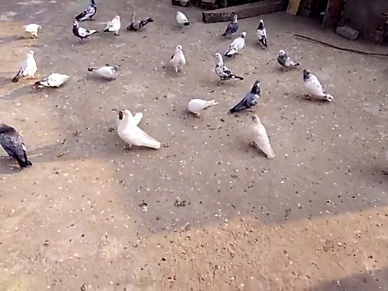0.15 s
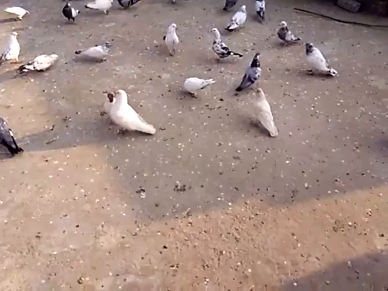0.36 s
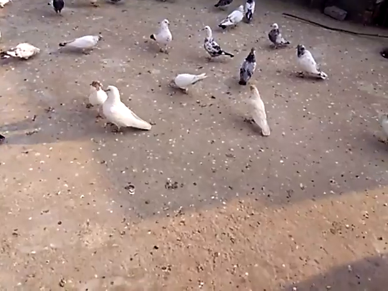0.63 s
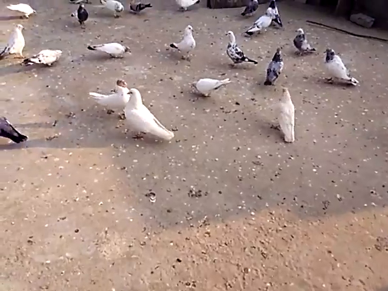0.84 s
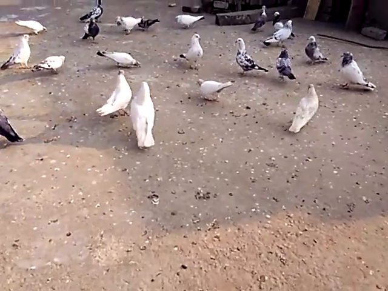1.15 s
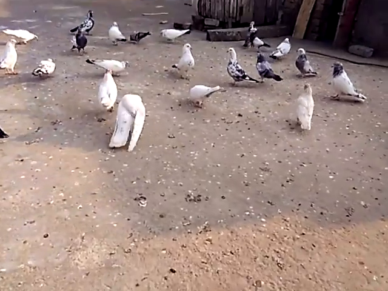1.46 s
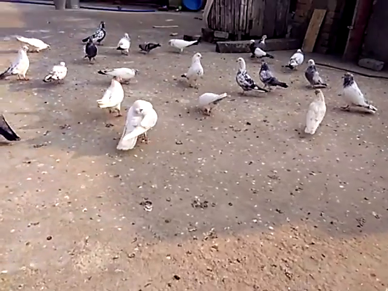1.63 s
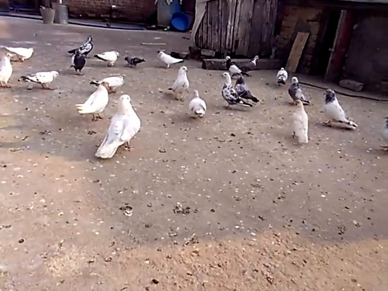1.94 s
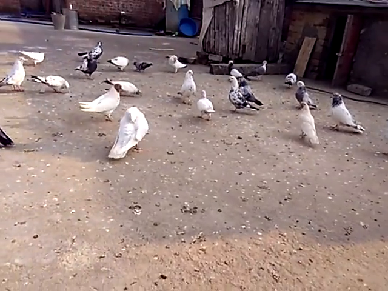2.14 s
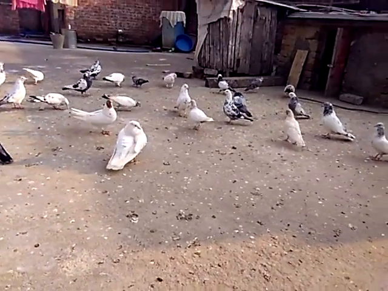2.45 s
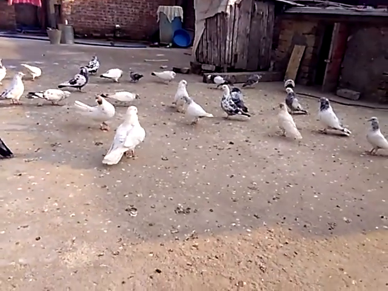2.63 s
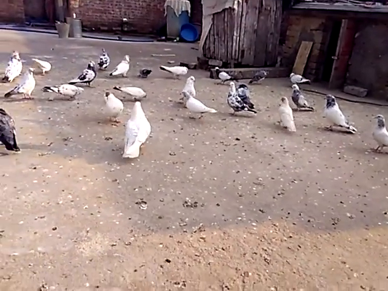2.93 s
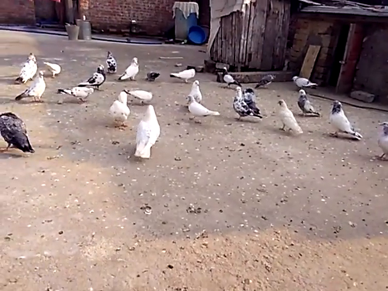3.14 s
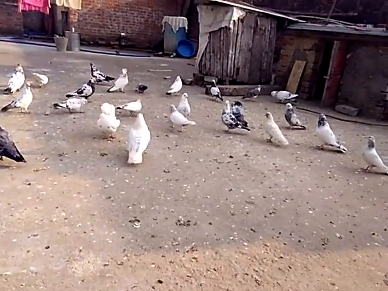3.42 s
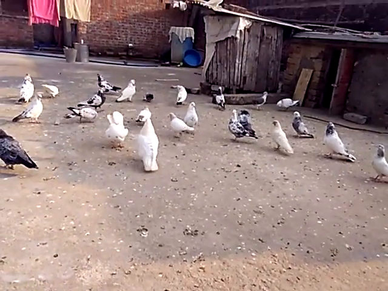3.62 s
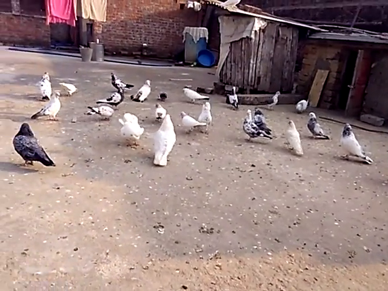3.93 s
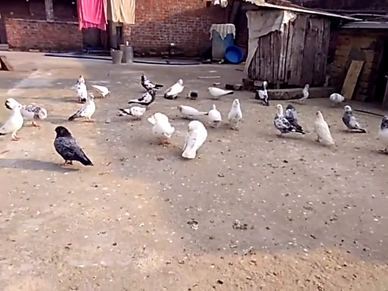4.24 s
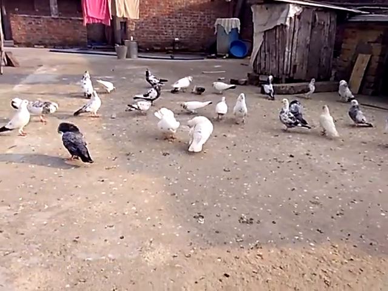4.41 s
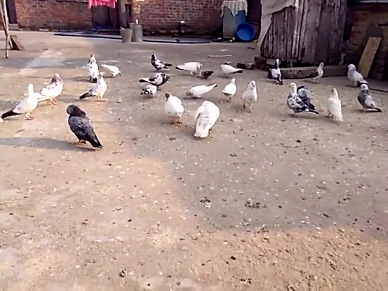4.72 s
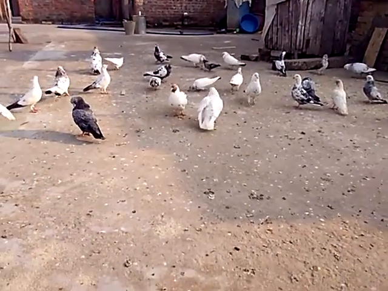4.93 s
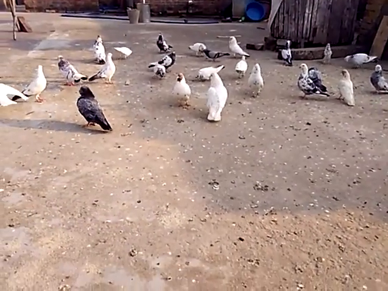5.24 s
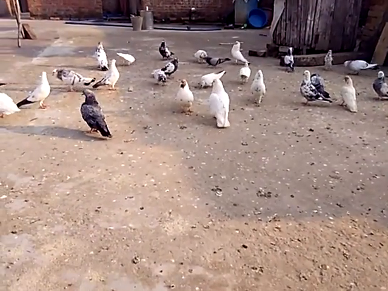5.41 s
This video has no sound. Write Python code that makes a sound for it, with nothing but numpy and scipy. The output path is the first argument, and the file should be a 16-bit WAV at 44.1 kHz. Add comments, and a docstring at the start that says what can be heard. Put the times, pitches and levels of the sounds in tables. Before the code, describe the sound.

Outdoor handheld pickup with slightly dulled highs and short, soft echoes from yard walls. Pigeons coo throughout, some close and throaty, many blended behind, with light pecking and pattering on dirt. Hoarse caws come from far away and fine hiss swells faintly. Midway, gritty shoe scuffs and a sharp dominant thud intrude close up; afterward there are more coos, sparse pecks and tiny stony clinks.

```python
"""Pigeons feed and coo in a brick courtyard over low outdoor rumble. From the start tiny clicks of feet and short
crunches of beaks and claws tick on the dirt, a flock of swelling notes murmurs, and crows caw far off with rasping
harmonics. Near males stutter short notes and slide down long hollow coos; from 1.2 s a faint high hiss swells
at times. From 3 to 4 s shoes scuff as filtered grit noise and thud as pushed dead modes close to the
microphone; cooing and pecking go on, and from 4.9 s flicked grit clinks on stone as decaying sines."""
import sys
import numpy as np
from scipy import signal
from scipy.fft import rfft, irfft
from scipy.io import wavfile
from scipy.ndimage import map_coordinates

SR = 44100
rng = np.random.default_rng(int(sys.argv[2]) if len(sys.argv) > 2 else 0)


def output_pcm(signal):
    """Save a mono or channel-first signal as 16-bit PCM at the path in sys.argv[1].

    Samples are clipped to [-1, 1] before scaling.
    """
    pcm = np.clip(np.atleast_2d(signal).T, -1, 1) * 32767
    wavfile.write(sys.argv[1], SR, np.round(pcm).astype(np.int16))


N = 245637
T = np.arange(N) / SR


def undb(db):
    """Decibels to gain."""
    return 10 ** (np.asarray(db) / 20)


def unit(x):
    """Scale to rms 1."""
    return x / np.sqrt(np.mean(x ** 2) + 1e-18)


def add(out, start_s, x):
    """Mix x into out from start_s, cut to the bounds of out."""
    i = int(start_s * SR)
    x, i = x[max(-i, 0):], max(i, 0)
    out[i:i + len(x)] += x[:max(N - i, 0)]


def wander(count, rate_hz):
    """Smooth chance of spread 1 that changes about rate_hz times a second."""
    place = np.arange(count) * rate_hz / SR
    return map_coordinates(rng.standard_normal(2048), [place], order=3, mode="wrap")


def colour(x, points):
    """Filter by a spectrum of (Hz, dB) points, straight on a log frequency axis; rms 1."""
    point_hz, point_db = np.transpose(points)
    bin_hz = np.maximum(np.fft.rfftfreq(len(x), 1 / SR), 1)
    gain = undb(np.interp(np.log(bin_hz), np.log(point_hz), point_db))
    return unit(irfft(rfft(x) * gain, len(x)))


def resonate(x, centre_hz, width_hz):
    """One resonance with gain 1 at its centre."""
    return signal.lfilter(*signal.iirpeak(centre_hz, centre_hz / width_hz, fs=SR), x)


def fade(t, edge_s):
    """Linear rise and fall at both ends of the times t."""
    return np.clip(np.minimum(t - t[0], t[-1] - t) / edge_s, 0, 1)


def swell(t, attack_s, hold_s, release_s):
    """Linear rise, hold, exponential decay; t counts from the start."""
    decay = np.exp(-np.maximum(t - attack_s - hold_s, 0) / release_s)
    return np.clip(t / attack_s, 0, 1) * decay


def grains(per_s, spread_db):
    """Random clicks, most small and a few large."""
    size = undb(spread_db * np.minimum(rng.exponential(size=N), 5))
    return (rng.random(N) < per_s / SR) * size * rng.standard_normal(N)


def yard(x, wet_db):
    """Scattered echoes from walls and sheds, dull and soon gone."""
    t60_s, first_echo_s = 0.42, .014
    t = T[:SR]
    hits = rng.standard_normal(SR) * (rng.random(SR) < .02)
    echoes = hits * undb(-60 * t / t60_s) * (t > first_echo_s)
    echoes = signal.lfilter(*signal.butter(1, 3000, fs=SR), echoes)
    wet = signal.fftconvolve(x, echoes / np.linalg.norm(echoes))[:N]
    return x + undb(wet_db) * wet


def throat(hz, second_db, rough):
    """Closed-beak voice, throbbing in pitch and strength; its second harmonic swells at the crop resonance."""
    crop_hz, crop_width_hz = 530, 83
    throb_hz, throb_depth, throb_pitch = 38, .12, .007  # depth and pitch as shares
    count = len(hz)
    throb_phase = 2 * np.pi * throb_hz * np.arange(count) / SR
    throb = np.sin(throb_phase + 2 * wander(count, throb_hz / 2))
    jitter = 0.0082 * wander(count, 37.3) + 0.1 * rough * wander(count, 130.55)
    phase = 2 * np.pi * np.cumsum(hz * (1 + throb_pitch * throb + jitter)) / SR
    tremble = 1 + throb_depth * throb + rough * (wander(count, 58.3) + .5 * wander(count, 339.3))
    second = undb(second_db) / np.hypot(1, 2 * (2 * hz - crop_hz) / crop_width_hz)
    return np.sqrt(2) * tremble * (np.sin(phase) + second * np.sin(2 * phase))


def note(hz, length_s, fall, rough):
    """Gaussian swell of the voice, length_s wide at 1/e of the peak; pitch runs from 1 + fall to 1 - fall."""
    u = np.linspace(-1, 1, int(2 * length_s * SR))
    return throat(hz * (1 - fall * u), -14.0, rough) * np.exp(-4 * u ** 2) / np.sqrt(2)


def ping(hz, t60_s, attack_s):
    """One small hard thing rings and dies away."""
    t = T[:SR // 12]
    return np.sin(2 * np.pi * hz * t) * np.minimum(t / attack_s, 1) * undb(-60 * t / t60_s)


def air():
    """Low outdoor rumble: coloured noise at a nearly steady level."""
    # spectrum: hz, relative_db
    air_colour = [(25, 8.5), (45, 1.5), (72, 9), (100, -5.5), (190, -3.5), (330, 0.5), (700, -10),
                  (1100, -19.5), (2000, -23.5), (4000, -31.5), (7000, -43.5), (9700, -42.5)]
    level_db = -54.5 + 0.083 * wander(N, 6.7)
    return colour(rng.standard_normal(N), air_colour) * undb(level_db)


def patter():
    """Small feet stir the dirt in uneven flurries of tiny clicks."""
    # stir of many feet: time_s, relative_level_db
    stir = [(0, -50.5), (.15, -61.5), (.3, -65), (.85, -62), (1.15, -69.5), (1.5, -62.5), (1.95, -66.5),
            (2.25, -67), (2.37, -72), (2.5, -72.5), (2.75, -67), (3.1, -62.5), (3.8, -66), (4.05, -65.5),
            (4.25, -75), (4.68, -75), (4.8, -60.5), (5.05, -64.5), (5.3, -68.5), (5.57, -71.5)]
    # dirt click spectrum: hz, relative_db
    dirt_colour = [(500, 3.5), (1200, 2), (3200, -1), (5000, -9.5), (7000, -11.5), (9700, -17.5)]
    swing_db = 3 * wander(N, 22.24)
    stir_db = np.interp(T, *np.transpose(stir)) + swing_db
    clicks = grains(1700, 2.3)
    return yard(colour(clicks, dirt_colour) * undb(stir_db - 5.0), wet_db=-7.0)


def flock(count=130):
    """Further birds overlap their low coos and higher grunts."""
    # murmur level: time_s, relative_level_db
    murmur = [(0.0, -59.5), (0.38, -67), (0.59, -54), (.98, -54), (1.3, -55), (1.55, -60), (1.88, -51.5),
              (2.2, -62.5), (2.4, -57.5), (2.53, -58), (2.75, -51), (2.95, -56.5), (3.1, -49.5),
              (3.25, -46.5), (3.57, -61), (4.1, -49.5), (4.3, -54.5), (4.5, -46.5), (4.67, -52),
              (4.98, -61), (5.23, -63.5), (5.57, -51.5)]
    out = np.zeros(N)
    for k, (when, pitch, length, size) in enumerate(rng.random((count, 4))):
        is_grunt = k % 2
        hz = (470 if is_grunt else 295) * (1 + .24 * (pitch - .5))
        db = 7 * size - (2.5 if is_grunt else 0)
        call = note(hz, 0.04 + 0.099 * length, fall=0.0948, rough=0.27)
        add(out, (k + when) / count * T[-1] - .1, undb(db) * call)
    level_db = np.interp(T, *np.transpose(murmur)) + 1.5
    return unit(yard(out, wet_db=-18.0)) * undb(level_db)


def crow():
    """Second and third harmonics of an arching pitch rasp by uneven flutter; a far wall repeats each caw."""
    # distant caws: start_s, length_s, top_fundamental_hz, droop_share, relative_level_db, third_re_second_db
    caws = [(-.1, .29, 665, .2, -56.5, -1), (.875, .26, 570, .27, -56, 2), (1.27, .29, 655, .22, -55, 0),
            (1.725, .28, 668, .26, -54, -2), (2.535, .27, 597, .1, -57.5, -5),
            (2.62, .24, 700, .15, -61, -12), (2.83, .22, 728, .12, -64, -11),
            (2.98, .25, 628, .15, -54, -5), (3.47, .26, 620, .15, -57, 0), (3.96, .13, 730, .1, -65, -10),
            (4.21, .15, 628, .12, -67, -12), (4.49, .1, 630, .1, -70, -12),
            (4.56, .18, 555, .05, -66.5, -12), (4.95, .25, 586, .06, -67.5, -14)]
    throat_hz, throat_width_hz = 1460, 520
    cycles_per_flutter, core_rasp = 4.5, .6
    wall_delay_s, wall_db = 0.057, -18.5
    out = np.zeros(N)
    for start_s, length_s, top_hz, droop, db, third_db in caws:
        t = T[:int(length_s * SR)]
        arch = (2.5 * t / length_s - 1) ** 2 / 2  # pitch tops at 40 % of the length
        hz = top_hz * (1 - droop * arch) * (1 + .012 * wander(len(t), 150))
        phase = 2 * np.pi * np.cumsum(hz) / SR
        flutter = phase / cycles_per_flutter + .35 * wander(len(t), 60)
        rasp = .8 * np.sin(flutter) + .8 * np.sin(2 * flutter) + .22 * wander(len(t), 450)
        second = (1 + core_rasp * rasp) * np.sin(2 * phase)
        third = undb(third_db) * (1 + rasp) * np.sin(3 * phase)
        # the open throat favours one broad band
        voice = resonate(second + third, throat_hz, throat_width_hz)
        caw = undb(db) * unit(voice * fade(t, 0.065))
        add(out, start_s, caw)
        add(out, start_s + wall_delay_s, undb(wall_db) * caw)
    dull = signal.lfilter(*signal.butter(4, 1860, fs=SR), out)
    return yard(dull * undb(-4.5), wet_db=-10.0)


def pecks():
    """A beak or claw snaps through grit: a short crunch, broad in colour with one stronger band."""
    # nearest pecks and scratches: start_s, relative_peak_db, centre_hz, time_scale_s
    snaps = [(0.017, -42, 2600, 0.019), (0.039, -42, 1540, 0.0059), (0.16, -36.5, 2800, 0.0075),
             (0.118, -51, 3200, 0.0043), (0.186, -54, 2830, 0.013), (0.244, -48.5, 3020, 0.0038),
             (0.309, -53.5, 3150, 0.0059), (0.364, -48.5, 900, 0.025), (0.482, -52, 2710, 0.011),
             (0.495, -43, 3300, 0.009), (0.548, -49.5, 2720, 0.0029), (0.644, -50.5, 4140, 0.03),
             (0.66, -45, 646, 0.019), (0.781, -54.5, 2790, 0.018), (0.839, -42.5, 2760, 0.016),
             (0.856, -42.5, 3200, 0.0099), (0.9634, -49.5, 3600, 0.0051), (1.009, -52.5, 2580, 0.01),
             (1.431, -52.5, 3440, 0.0055), (2.115, -79, 1370, 0.0097), (2.37, -51.5, 2050, 0.0077),
             (4.583, -67, 1700, 0.0025), (4.633, -57, 1590, 0.0036), (4.741, -56.5, 3140, 0.05),
             (4.809, -45.5, 3170, 0.0022), (4.895, -53.5, 3020, 0.0076), (5.037, -54, 3640, 0.016),
             (5.236, -55.5, 1110, 0.0043), (5.335, -57, 3800, 0.0044), (5.402, -56.5, 3370, 0.029),
             (5.44, -50, 2090, 0.0087), (5.502, -55, 1890, 0.019), (5.524, -57, 2820, 0.0084)]
    # grit spectrum: hz, relative_db
    grit_colour = [(200, -16), (700, 10), (2500, 0.5), (5000, -4.5), (9700, -8), (12000, -39.5)]
    out, t = np.zeros(N), T[:SR // 6]
    grit = colour(grains(5000, 0.98), grit_colour)
    for start_s, db, hz, scale_s in snaps:
        push = t / scale_s * np.exp(-2.7 * t / scale_s)
        crunch = push * grit[rng.integers(N - len(t)):][:len(t)]
        crunch = resonate(crunch, hz, .5 * hz) + undb(-16.5) * crunch
        add(out, start_s, undb(db + 4.5) * crunch / np.abs(crunch).max())
    return yard(out, wet_db=-14.5)


def far_birds(count=30):
    """Thin, nearly level notes from beyond the yard: a few clear ones among faint ones at random."""
    # clearest calls: peak_s, peak_db, pitch_hz, length_s, fall_share (negative rises)
    calls = [(0.274, -62, 673, .03, -0.0051), (2.105, -53.5, 614, 0.032, -0.047),
             (2.141, -55, 726, 0.027, -0.098), (2.408, -54, 828, 0.025, -0.042),
             (2.613, -57.5, 772, 0.022, 0), (3.69, -52.5, 685, 0.031, 0.033),
             (3.987, -54.5, 709, 0.031, -0.044), (4.061, -58, 737, .03, -0.044),
             (4.252, -54, 727, 0.047, -0.062), (4.312, -60, 764, 0.039, -0.046),
             (4.543, -59, 757, 0.051, -0.063), (4.62, -65, 813, .04, -0.043),
             (4.792, -57.5, 634, 0.063, 0.074)]
    faint_db, faint_low_hz, faint_range_octaves, faint_length_s = -67, 705, 0.51, 0.056
    out = np.zeros(N)
    for peak_s, db, hz, length_s, fall in calls:
        add(out, peak_s - length_s, undb(db) * note(hz, length_s, fall, rough=0.15))
    for k, (when, pitch) in enumerate(rng.random((count, 2))):
        hz = faint_low_hz * 2 ** (faint_range_octaves * pitch)
        call = note(hz, faint_length_s, fall=0.022, rough=0.5)
        add(out, (k + when) / count * T[-1], undb(faint_db) * call)
    return yard(out, wet_db=-15.5)


def near_pigeons():
    """Stuttered notes lead into long coos, which drop quickly in pitch, then sag in pitch and mostly in strength."""
    # long coos: start_s, length_s, start_hz, end_hz, glide_s, level_db, attack_s, sag_db (negative swells),
    # second_harmonic_at_crop_resonance_db, roughness_0_to_1
    coos = [(0.384, 0.17, 530.6, 328.6, 0.051, -41.5, 0.082, 0, -21, 0.25),
            (.545, 0.13, 374.4, 302, .075, -45.5, 0.016, 0.5, -10, 0.25),
            (1.038, 0.27, 415.3, 253.6, 0.043, -37.5, 0.057, 5.5, -13.5, 0.11),
            (1.697, 0.11, 471, 402.5, 0.073, -41.5, 0.017, 10.5, -30, 0.21),
            (1.794, 0.23, 366, 285.5, .08, -48, .02, -4, -16.5, .1),
            (2.01, 0.1, 320, 294, .04, -51.5, 0.024, 2, -20, 0.28),
            (2.661, 0.34, 478, 450, 0.35, -52.5, .035, 1, -20, 0.33),
            (2.93, 0.15, 503, 451, .1, -39, 0.074, 5, -20, 0.25),
            (3.051, 0.13, 384, 296.5, 0.0544, -31, 0.033, 13, -17, 0.11),
            (3.161, .135, 355.6, 307, 0.11, -42, 0.023, 1, -12, .08),
            (4.327, 0.25, 402.2, 280.8, .042, -34.5, 0.026, 16.5, -17.5, 0.2),
            (4.662, 0.23, 489.7, 294, 0.037, -34, 0.038, 20, -19, 0.15),
            (4.893, 0.1, 283, 262, .05, -53, 0.015, 14, -23, 0.29)]
    # stuttered notes: peak_s, peak_db, pitch_hz, length_s
    stutters = [(0.12, -46, 313, 0.018), (.163, -37, 355, 0.011), (0.232, -39, 373, 0.014),
                (.285, -48, 377, 0.021), (0.67, -35, 298, 0.018), (0.707, -37.5, 309, 0.015),
                (0.761, -32, 350.5, 0.016), (0.832, -32.5, 395, 0.016), (0.919, -35, 311, 0.02),
                (1.332, -43, 571, 0.019), (1.356, -41.5, 282, 0.021), (1.4, -38, 327, 0.015),
                (1.454, -40, 394, 0.012), (1.492, -42.5, 408, 0.024), (1.59, -42, 437, 0.016),
                (1.669, -42, 552, 0.02), (1.745, -38.5, 469, 0.016), (1.776, -44, 453, 0.011),
                (1.789, -35.5, 378, .01), (1.945, -43, 465, 0.012), (2.068, -40, 332, 0.014),
                (2.213, -44, 459, 0.019), (2.51, -47, 293, .016), (2.547, -42, 282, .014),
                (2.578, -47, 330, 0.017), (2.543, -39, 450, 0.014), (2.602, -35, 464, .011),
                (2.659, -38.5, 452, 0.011), (2.692, -39, 281, 0.019), (2.722, -41, 448.5, 0.025),
                (2.741, -37, 314, 0.035), (2.781, -43, 512, .03), (2.805, -29.5, 369, .013),
                (2.829, -37.5, 310, 0.033), (2.889, -35.5, 316, .013), (2.892, -42, 511, 0.014),
                (2.855, -46, 450, 0.014), (2.925, -39, 349, 0.019), (4.032, -27.5, 337, 0.015),
                (4.106, -29, 333, 0.015), (4.3, -43, 309, 0.019), (4.497, -49.5, 474, .05),
                (4.605, -45.5, 523, 0.028), (4.622, -35, 434.4, .011), (4.638, -44, 534, 0.02),
                (4.925, -52, 473, .022), (4.975, -52, 331, 0.018), (5.175, -52, 332, 0.013),
                (5.21, -51, 483, 0.014), (5.275, -51.5, 487, 0.019), (5.42, -53, 457, 0.02),
                (5.48, -51.5, 284, 0.017), (5.549, -35, 335, 0.014)]
    pitch_sag_per_s, release_s = 0.506, 0.022  # sag as a share of end_hz
    out = np.zeros(N)
    for start_s, length_s, start_hz, end_hz, glide_s, db, attack_s, sag_db, second_db, rough in coos:
        t = np.arange(0, length_s, 1 / SR)
        held_hz = end_hz * (1 + pitch_sag_per_s * (length_s - t))
        hz = held_hz + (start_hz - held_hz[0]) / (1 + (t / glide_s) ** 3)
        edges = np.clip(np.minimum(t / attack_s, (length_s - t) / release_s), 0, 1)
        strength = edges * undb(db - sag_db * t / length_s)
        add(out, start_s, throat(hz, second_db, rough) * strength)
    for peak_s, db, hz, length_s in stutters:
        add(out, peak_s - length_s, undb(db) * note(hz, length_s, fall=0.16, rough=0.26))
    return yard(out, wet_db=-19.0)


def high_hiss():
    """Short, bright swells of fine crackling hiss."""
    # swells: start_s, level_db, length_s
    swells = [(1.25, -71, .36), (1.7, -71, .2), (2.04, -66, .16), (2.2, -68, .38), (2.62, -71.5, .42),
              (4.88, -72, .36)]
    # hiss spectrum: hz, relative_db
    hiss_colour = [(1000, -18), (2800, -7.5), (4800, -4.5), (6500, 6.5), (8200, -1), (9500, 2)]
    strength = np.zeros(N)
    for start_s, db, length_s in swells:
        add(strength, start_s, undb(db) * np.hanning(int(length_s * SR)))
    return colour(grains(6600, 1.5), hiss_colour) * strength


def scuffs():
    """A sliding sole catches and slips, grinds small stones and drags hissing dust and fine sand."""
    # shoe drags on grit: start_s, attack_s, hold_s, release_s, hiss_db, grind_db, sand_db
    drags = [(3.014, 0.012, 0.03, 0.022, -49.5, -44.5, -57.5),
             (3.137, 0.051, 0.017, 0.098, -61.5, -50, -69), (3.26, 0.043, 0.074, 0.039, -51, -38, -53.5),
             (3.394, 0.12, 0.13, 0.0062, -59, -67, -56.5), (3.524, 0.037, 0.059, 0.013, -42.5, -47, -52),
             (3.678, 0.057, 0.01, 0.0086, -70, -48, -95), (3.849, 0.05, 0.063, 0.0045, -45, -52, -85)]
    # sliding dust spectrum: hz, relative_db
    dust_colour = [(900, 5), (2000, 6), (3200, 1), (5300, -3.5), (6500, -7.5), (8000, -14), (9700, -15)]
    # ground stone spectrum: hz, relative_db
    grind_colour = [(30, -12), (70, -6), (150, 7), (350, 5), (750, 8), (1100, -1), (1700, -2), (2800, -20),
                    (6000, -52)]
    sand_hz, sand_width_hz = 5040, 3000
    catch_db, catch_hz = 1.5, 107.7  # depth and rate of catch and slip
    hiss = colour(grains(14000, 0.95), dust_colour)
    grind = colour(grains(2200, 0.37), grind_colour)
    sand = resonate(grains(11000, 1.6), sand_hz, sand_width_hz)
    sand = unit(resonate(sand, sand_hz, sand_width_hz))
    out = np.zeros(N)
    for start_s, attack_s, hold_s, release_s, hiss_db, grind_db, sand_db in drags:
        mix = hiss * undb(hiss_db) + grind * undb(grind_db) + sand * undb(sand_db)
        out += swell(T - start_s, attack_s, hold_s, release_s) * mix
    return yard(out * undb(catch_db * wander(N, catch_hz)), wet_db=-35.0)


def footfalls():
    """Each push of the sole rings a few dead modes, and the air swings back as it stops; long contact is duller."""
    # footfalls: push_centre_s, peak_db, contact_ms
    thuds = [(3.018, -27, 2.46), (3.044, -35.5, 3.6), (3.065, -38, 10), (3.134, -41, 4), (3.195, -41, 6.3),
             (3.223, -48, 13), (3.282, -29.5, 8.9), (3.293, -30, 1.1), (3.386, -24.5, 0.47),
             (3.436, -27, 0.53), (3.546, -12.5, 0.7), (3.5616, -16.5, 0.58), (3.571, -23.5, 2.1),
             (3.579, -34, 4.5), (3.919, -29.5, 1.3), (3.949, -28.5, 0.95)]
    # sole on packed earth: mode_hz, relative_db, t60_s
    sole_modes = [(37.6, -8.5, 0.16), (73, 2.5, 0.1), (133, -4, 0.06), (264, 18, 0.0075), (632, 16, 0.0059),
                  (950, -8, 0.011)]
    lead_s = 1 / 200  # from the start of the push to its centre
    out, t = np.zeros(N), T[:SR // 5]
    ring = sum(undb(db - 60 * t / t60_s) * np.cos(2 * np.pi * hz * t) for hz, db, t60_s in sole_modes)
    for centre_s, db, contact_ms in thuds:
        u = (t - lead_s) * 1000 / contact_ms
        push = np.exp(-np.pi * u ** 2) - 0.33 * np.exp(-np.pi * (u - 1.2) ** 2)
        thud = signal.fftconvolve(ring, push)[:len(t)]
        add(out, centre_s - lead_s, undb(db) * thud / np.abs(thud).max())
    return out


def clinks():
    """Flicked bits of grit strike stone, which rings briefly."""
    # strikes: start_s, level_db (before ring decay), pitch_hz
    strikes = [(4.918, -49.5, 1620), (5.04, -60, 1660), (5.119, -51, 1640), (5.159, -57, 1350),
               (5.275, -52, 1660), (5.375, -55, 1610), (5.368, -64, 2760)]
    out = np.zeros(N)
    for start_s, db, hz in strikes:
        add(out, start_s, undb(db) * ping(hz, t60_s=0.036, attack_s=0.0026))
    return yard(out, wet_db=-19.0)


def scene():
    """All the sources of the courtyard at one microphone."""
    birds = near_pigeons() + flock() + crow() + far_birds()
    shoes = scuffs() + footfalls()
    ground = pecks() + clinks() + patter()
    return (birds + shoes + ground + high_hiss() + air())[None]


def record(dry):
    """Microphone chain: gentle high-pass at 20 Hz, steep low-pass at 9.8 kHz."""
    dry = signal.sosfilt(signal.butter(1, 20, "high", fs=SR, output="sos"), dry)
    return signal.sosfilt(signal.ellip(10, .2, 80, 9800, fs=SR, output="sos"), dry)


dry = scene()
out = record(dry)
output_pcm(out)
```